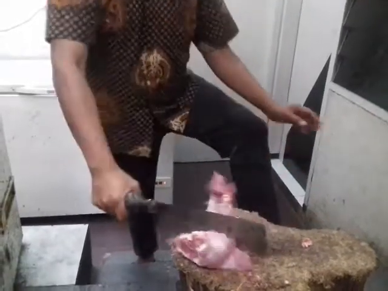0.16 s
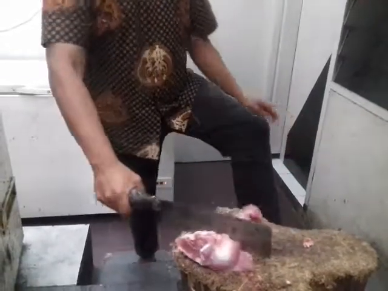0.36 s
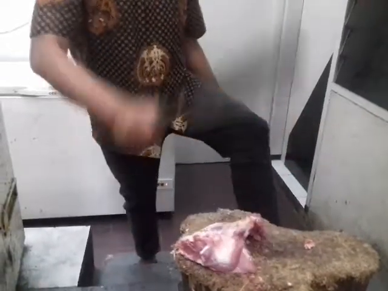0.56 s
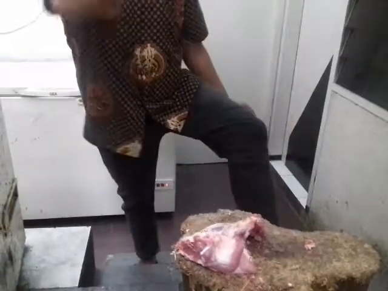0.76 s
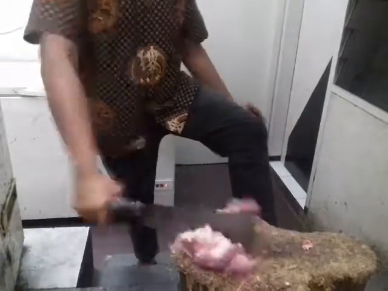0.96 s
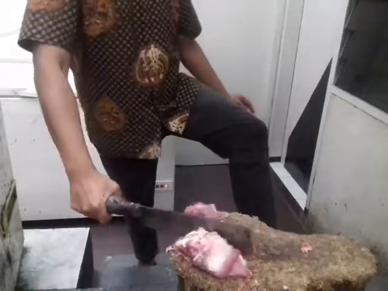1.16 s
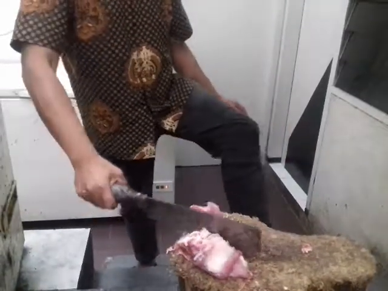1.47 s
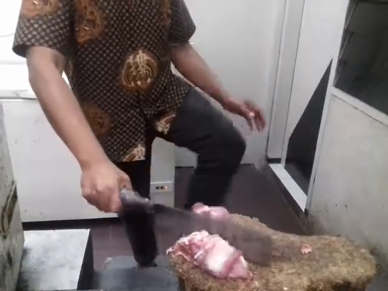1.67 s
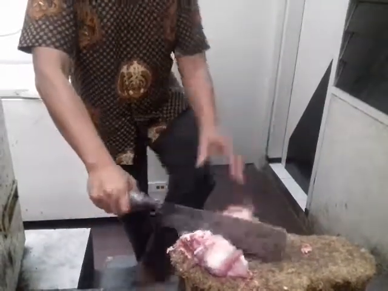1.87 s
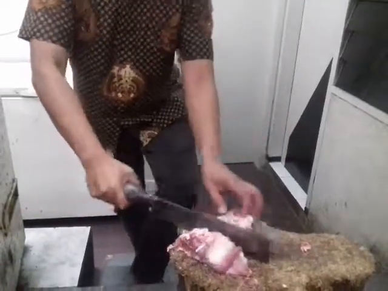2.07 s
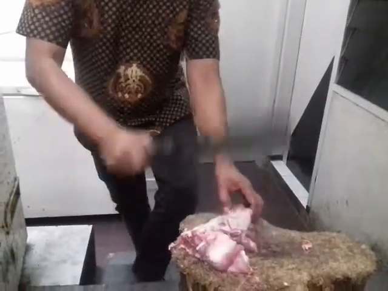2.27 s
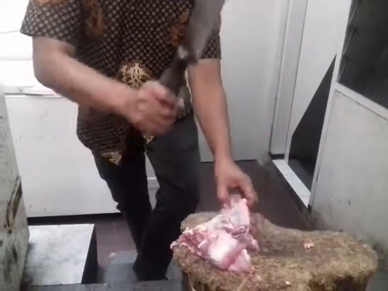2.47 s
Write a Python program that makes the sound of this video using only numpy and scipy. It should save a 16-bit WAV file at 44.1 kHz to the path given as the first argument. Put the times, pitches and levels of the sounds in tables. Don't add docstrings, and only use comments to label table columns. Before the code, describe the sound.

A heavy cleaver strikes meat and bone on a wooden block twice, under a second apart, with blade ring and hard room echo; faint traffic behind, an engine nearing at the end, small close microphone.

```python
import sys
import numpy as np
from scipy import signal
from scipy.fft import rfft, irfft
from scipy.io import wavfile
from scipy.ndimage import uniform_filter1d, minimum_filter1d

SR = 44100
rng = np.random.default_rng(int(sys.argv[2]) if len(sys.argv) > 2 else 0)


def generate_wav(sig):
    pcm = np.round(np.clip(np.atleast_2d(sig).T, -1, 1) * 32767).astype(np.int16)
    wavfile.write(sys.argv[1], SR, pcm)


def invert_db(x):
    u = np.asarray(x, float) / 20
    return 10 ** u


N = 114660


def evened(x):
    return x / np.sqrt(np.mean(x ** 2) + 1e-20)


def drift(shape, size):
    noise = rng.standard_normal(shape)
    return evened(uniform_filter1d(uniform_filter1d(noise, size=size), size=size))


def read(points, hz):
    f, value = np.transpose(points)
    return np.interp(np.log(hz + 1), np.log(f + 1), value)


def colour(x, points, humps=()):
    size = 4096
    hz = np.fft.rfftfreq(size, 1 / SR)
    db = read(points, hz)
    for centre_hz, width_hz, up_db in humps:
        db = db + up_db * np.exp(-((hz - centre_hz) / width_hz) ** 2)
    cepstrum = irfft(np.log(invert_db(db)))
    cepstrum[1:size // 2] *= 2
    cepstrum[size // 2 + 1:] = 0
    return signal.oaconvolve(x, irfft(np.exp(rfft(cepstrum))))[:len(x)]


def wash(points):
    patchy_db = -0.5
    frames, hz = N // 256 + 5, np.fft.rfftfreq(1024, 1 / SR)
    real, imag, patches = rng.standard_normal((frames, 513, 3)).T
    patches = uniform_filter1d(patches, size=12, axis=0)
    patches = evened(uniform_filter1d(patches, size=10, axis=1))
    gain = invert_db(read(points, hz)[:, None] + patchy_db * patches)
    return evened(signal.istft((real + 1j * imag) * gain, nperseg=1024, noverlap=768)[1][:N])


def throbbing_hum():
    pitch_hz, width_hz = 73, 23
    pole = np.exp(-np.pi * width_hz / SR)
    slow = rng.standard_normal((N, 2)) @ [1, 1j]
    for _ in range(2):
        slow = signal.lfilter([1 - pole], [1, -pole], slow)
    carrier = np.exp(2j * np.pi * pitch_hz * np.arange(N) / SR)
    return evened((slow * carrier).real)


def street():
    # start_s, level_db
    traffic = [(0, -54.5), (.5, -50.5), (.9, -52.5), (1.0, -53), (1.299, -54.5), (1.6, -57.5),
               (1.85, -61.5), (2.15, -61.5), (2.35, -57.5), (2.6, -54)]
    # pitch_hz, level_db
    wash_colour = [(18, -71), (30, -18), (51, -6), (74, -6), (138, -10.5), (167, -5.5), (490, -9),
                   (4000, -7.5), (9000, -61), (11700, -52), (19800, -120)]
    # pitch_hz, level_db
    fizz_colour = [(3000, -7), (5500, 10.5), (6500, -2), (9000, -5), (15500, -11.5)]
    level_db = np.interp(np.arange(N) / SR, *np.transpose(traffic))
    change_db = level_db - traffic[0][1]
    body = invert_db(level_db) * wash(wash_colour)
    fizz = invert_db(-75.5 + 2.34 * change_db) * wash(fizz_colour)
    hum = invert_db(-65.5 + 1.45 * change_db) * throbbing_hum()
    return body + fizz + hum


def engine():
    # start_s, pitch_hz, level_db
    approach = [(1.3, 168.5, -72), (1.899, 167, -76), (2.198, 169.5, -67.5), (2.418, 174.3, -69.5),
                (2.519, 173, -55.5), (2.6, 174, -54)]
    roughness = 0.1
    s, hz, db = np.transpose(approach)
    t = np.arange(N) / SR
    tone = np.sqrt(2) * np.sin(2 * np.pi * np.cumsum(np.interp(t, s, hz)) / SR)
    return invert_db(np.interp(t, s, db, left=-120)) * (1 + roughness * drift(N, 1200)) * tone


def swish():
    # peak_s, length_s, level_db
    breath = (0.97, 0.079, -62.5)
    # pitch_hz, level_db
    air_colour = [(2000, -28), (4000, 8.5), (6000, -1.5), (8000, -21), (14000, -21)]
    peak_s, length_s, level_db = breath
    swell = np.exp(-((np.arange(N) / SR - peak_s) / length_s) ** 2)
    return invert_db(level_db) * swell * wash(air_colour)


def room(build_s, share):
    # pitch_hz, t60_s
    decay = [(100, 0.49), (300, 0.66), (1000, 0.62), (3000, 0.67), (6500, 0.62), (8000, 0.57),
             (14000, 0.55)]
    spread_db = 3.5
    slots = np.arange(0, SR - 6, 6)
    taps = np.zeros(SR)
    taps[slots + rng.integers(0, 6, len(slots))] = rng.choice([-1.5, 1.5], len(slots))
    taps = taps * invert_db(spread_db * np.minimum(rng.exponential(1, SR), 4))
    hz, t, z = signal.stft(taps, SR, nperseg=256)
    fade_db = -60 * t / (share * read(decay, hz)[:, None])
    tail = signal.istft(z * invert_db(fade_db), SR, nperseg=256)[1][:SR]
    return tail * (1 - np.exp(-(np.arange(SR) / SR / build_s) ** 2))


def ring(modes, tilt_db=0., waver=0.):
    t = np.arange(SR) / SR
    y = np.zeros(SR)
    for hz, db, t60 in modes:
        fade = invert_db(db + tilt_db * (hz / 1000 - 2.5) - 60 * t / t60)
        y += fade * (1 + waver * drift(SR, 900)) * np.sin(2 * np.pi * hz * t + hz)
    return y / np.linalg.norm(invert_db([db for _, db, _ in modes]))


def blade_and_block(blade_db, thud_db, tilt_db):
    # level_db, t60_s
    blade = [(-14, .6), (-12, .35), (0, .66), (-7, .4), (-14, .4), (-17, .3), (-16, .4), (-13, .5),
             (-8, .55), (-1.5, .55), (-9, .5), (-15, .4), (-15, .4), (-24, .4)]
    blade_hz = [1541, 2297, 2577, 2602, 2708, 3190, 3415, 3530, 3607, 3704, 3757, 3975, 4140, 5135]
    # pitch_hz, level_db, t60_s
    block = [(140.4, -10, 0.23), (204, 0.5, .4), (254, -2, 0.59), (306, -8, 0.42), (359.2, -6, 0.66),
             (456.6, -32, 0.15), (529, -13, 0.94)]
    waver, rise_s = .3, .022
    steel = invert_db(blade_db) * ring([(hz, *mode) for hz, mode in zip(blade_hz, blade)], tilt_db, waver)
    wood = invert_db(thud_db) * ring(block, 0., waver)
    return (1 - np.exp(-np.arange(SR) / SR / rise_s)) * (steel + wood)


def splinter_click(tint):
    # pitch_hz, level_db
    snap_colour = [(35, -49), (100, -18.5), (350, -8.5), (1000, -17), (1900, -8.5), (2550, -8),
                   (2950, -8.5), (3700, -4)]
    # pitch_hz, width_hz, level_db
    humps = [(2575, 140, 6), (3697, 137, 4), (4230, 47, 5), (5140, 58, 5.5), (6700, 130, 1)]
    click = colour(colour(signal.unit_impulse(SR), snap_colour, humps), tint)
    return (click / np.linalg.norm(click))[:2048]


def crack(click, crack_s):
    # pitch_hz, level_db
    dullness = [(5000, 0), (8000, -3), (15000, -3)]
    splinters_per_s, rise_s = 6000, .0006
    t = np.arange(SR) / SR
    strength = .4 + (rng.random(SR) < splinters_per_s / SR)
    shower = signal.oaconvolve(rng.standard_normal(SR) * strength, click)[:SR]
    shower = colour(shower, dullness)
    shower = shower / np.std(shower[:round(crack_s * SR)])
    return (1 - np.exp(-t / rise_s)) * np.exp(-t / crack_s) * shower


def knock(wood):
    rise_s = .002
    return (1 - np.exp(-(np.arange(SR) / SR / rise_s) ** 2)) * ring(wood)


def chop(hit, landing, tint, crack_db, wood):
    _, knock_db, blade_db, thud_db, room_db = hit
    crack_s, build_s, share, tilt_db = landing
    click = splinter_click(tint)
    struck = invert_db(crack_db) * crack(click, crack_s) + invert_db(knock_db) * knock(wood)
    held = signal.oaconvolve(room(build_s, share), click)[:SR]
    return struck + blade_and_block(blade_db, thud_db, tilt_db) + invert_db(room_db) * held


def scene():
    # start_s, knock_db, blade_db, thud_db, room_db
    chops = [
        (0.2182, -15.5, -22.5, -26.5, -16),
        (1.079, -16, -18, -27.5, -15.5),
    ]
    # crack_s, room_build_s, decay_share, blade_tilt_db_per_khz
    landings = [
        (.007, 0.006, 0.82, 4.8),
        (0.014, 0.028, 0.8, -3),
    ]
    # pitch_hz, level_db
    tints = [
        [(130, -0.5), (1200, 3.5), (3800, -1), (5300, -13.5), (7000, -31), (10000, -38.5), (15500, -48)],
        [(130, -8.5), (500, 2), (3800, -0.5), (5300, -15), (6650, -28), (7000, -37.5), (10000, -44.5),
         (15500, -62.5)],
    ]
    crack_levels = [-10.5, -10]
    # pitch_hz, level_db, t60_s
    knocks = [
        [(139.1, -4, 0.3), (380, -20, 0.083), (582, 8, 0.091), (1230, 22, 0.076), (1507, -22, 0.093),
         (1990, -19, 0.033)],
        [(258.7, -9, 0.13), (400, 3.5, 0.055), (552, 5, 0.092), (1110, -2, 0.031), (2220, -4.5, 0.045),
         (2730, -3, .04)],
    ]
    out = street() + engine() + swish()
    for hit, *rest in zip(chops, landings, tints, crack_levels, knocks):
        part = out[round(hit[0] * SR):][:SR]
        part += chop(hit, *rest)[:len(part)]
    return out[None]


def limiter(x):
    threshold_db, squeeze, recover_db_per_s, lookahead_s = -24, .3, 90, .018
    ahead = round(lookahead_s * SR)
    power_db = 10 * np.log10(abs(uniform_filter1d(x[0] ** 2, size=200)) + 1e-12)
    fall_db = np.arange(N) * recover_db_per_s / SR
    held_db = np.maximum.accumulate(power_db + fall_db) - fall_db
    over_db = np.maximum(held_db - threshold_db, 0)
    early_db = -minimum_filter1d(-over_db, size=ahead + 1, origin=-(ahead // 2))
    return x / invert_db(squeeze * uniform_filter1d(early_db, size=ahead))


def low_pass(x):
    return signal.sosfilt(signal.butter(12, 15880, fs=SR, output="sos"), x)


def record(dry):
    low_cut_hz, ceiling, hiss_db = 69, 1.5, -92.5
    low_cut = signal.butter(3, low_cut_hz, 'high', fs=SR, output='sos')
    level = signal.sosfilt(low_cut, limiter(dry))
    hiss = invert_db(hiss_db) * rng.standard_normal(dry.shape)
    return low_pass(ceiling * np.tanh(level / ceiling) + hiss)


dry = scene()
out = record(dry)
generate_wav(out)
```